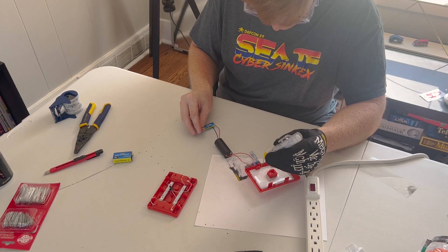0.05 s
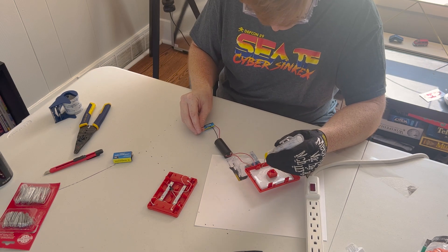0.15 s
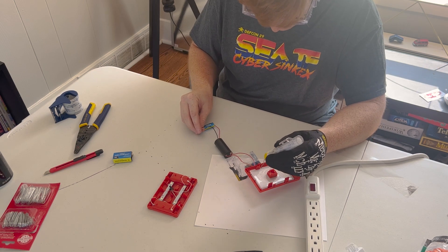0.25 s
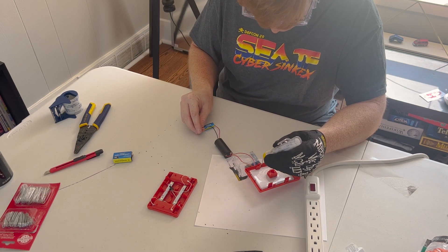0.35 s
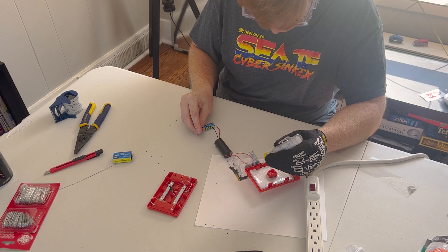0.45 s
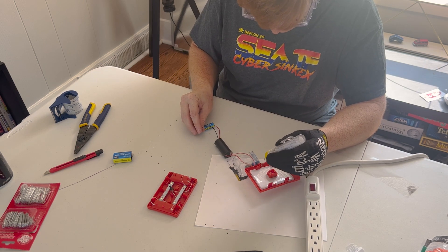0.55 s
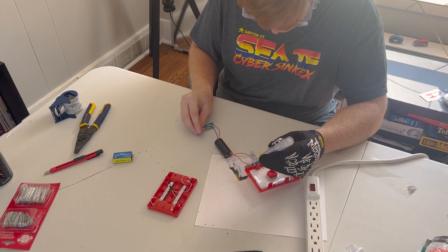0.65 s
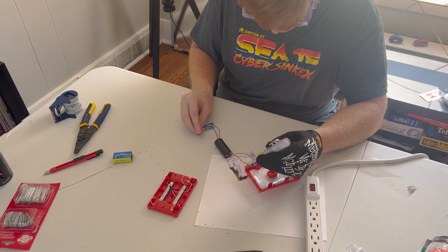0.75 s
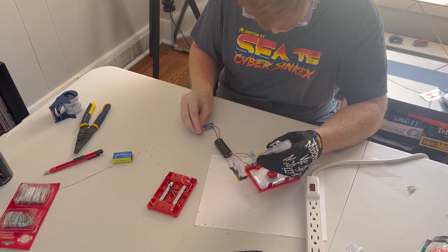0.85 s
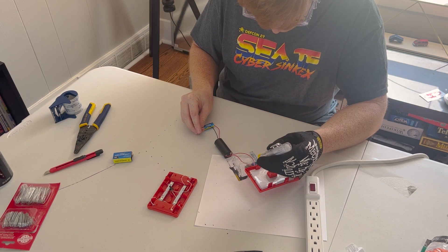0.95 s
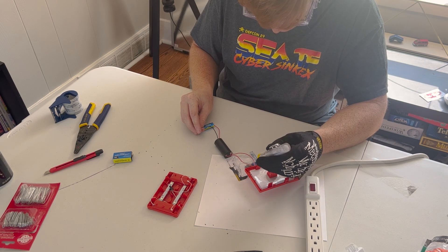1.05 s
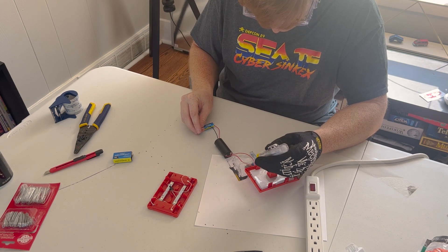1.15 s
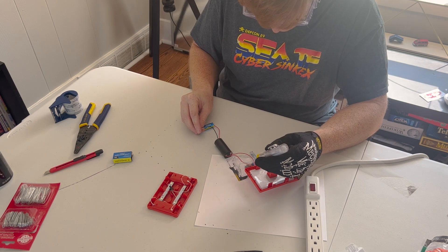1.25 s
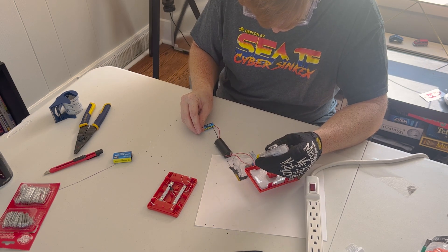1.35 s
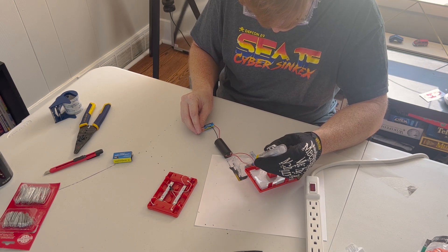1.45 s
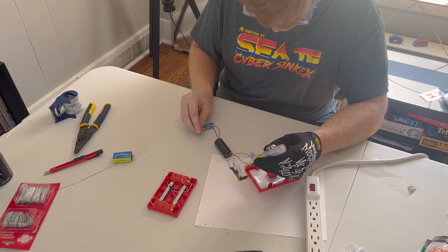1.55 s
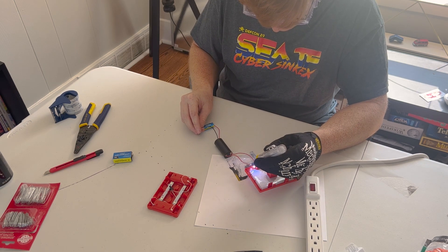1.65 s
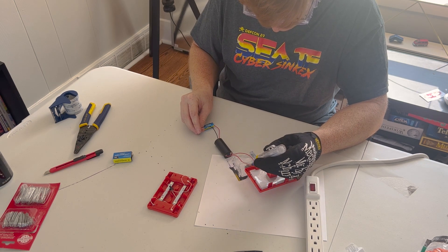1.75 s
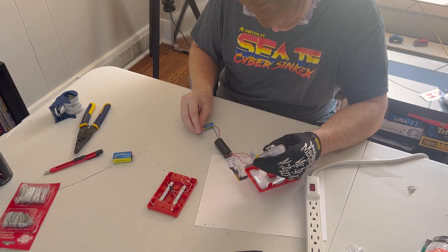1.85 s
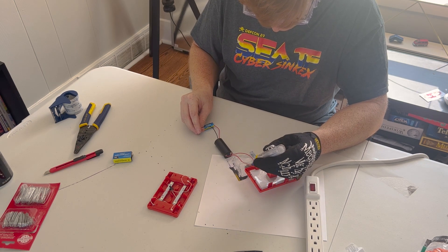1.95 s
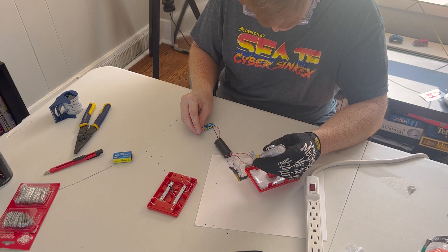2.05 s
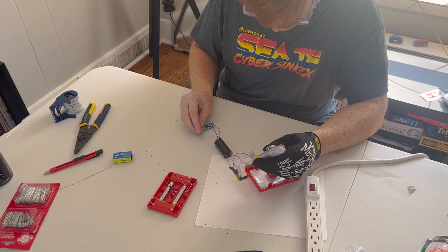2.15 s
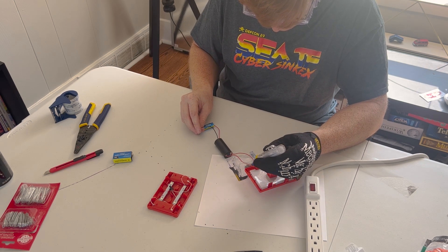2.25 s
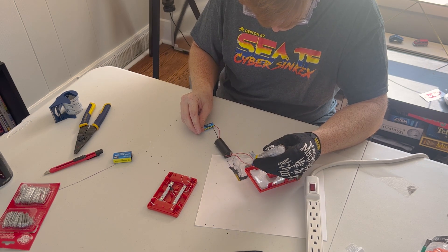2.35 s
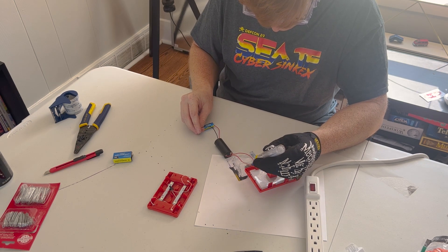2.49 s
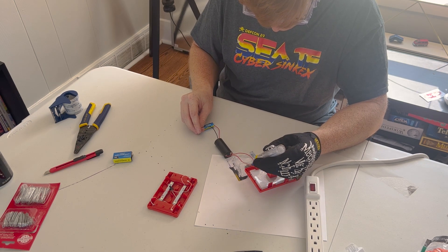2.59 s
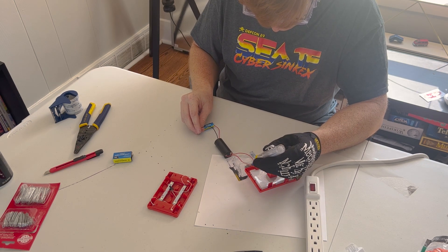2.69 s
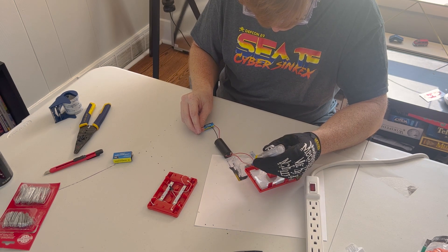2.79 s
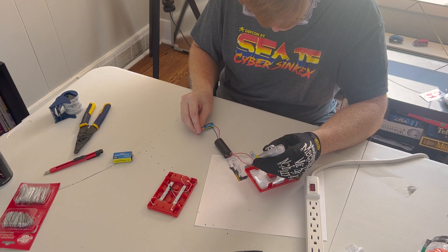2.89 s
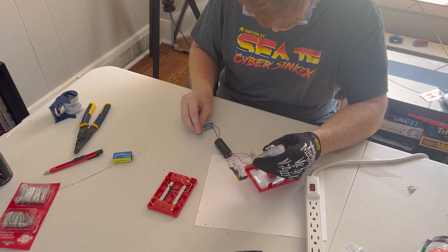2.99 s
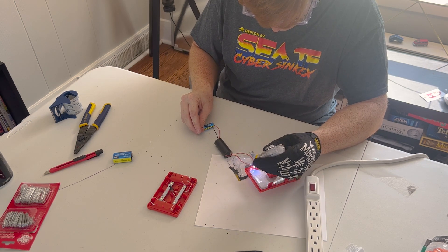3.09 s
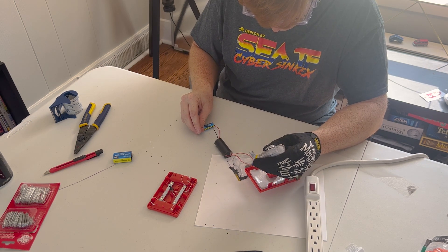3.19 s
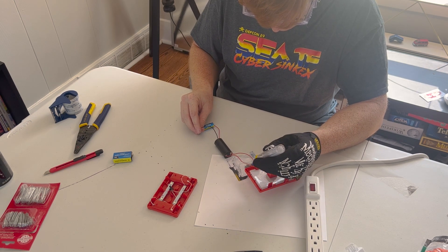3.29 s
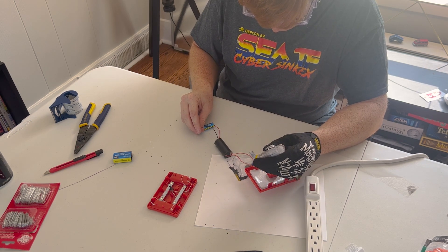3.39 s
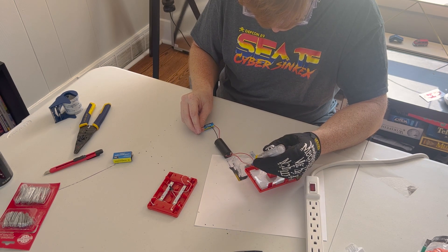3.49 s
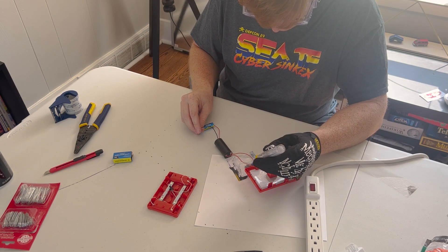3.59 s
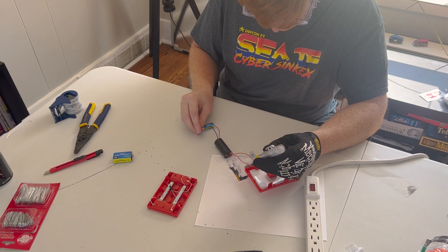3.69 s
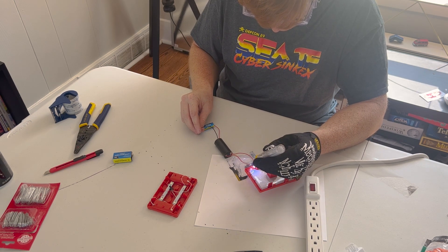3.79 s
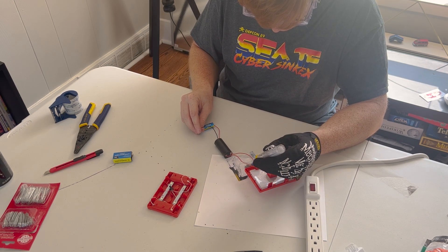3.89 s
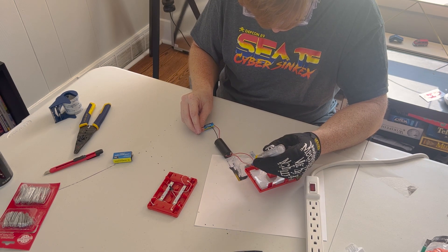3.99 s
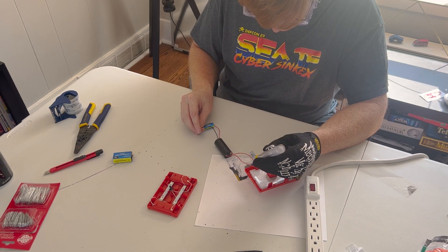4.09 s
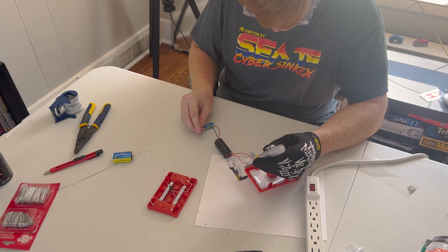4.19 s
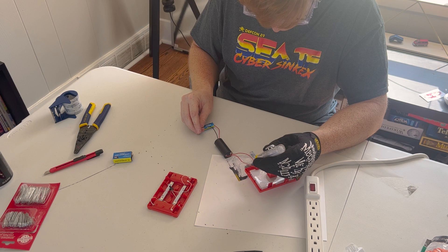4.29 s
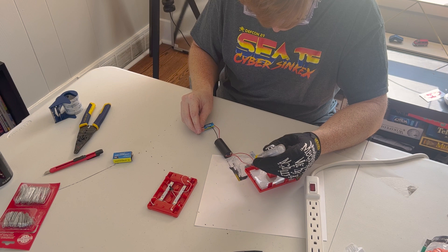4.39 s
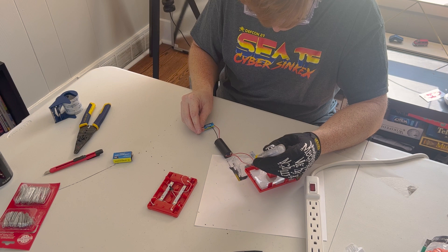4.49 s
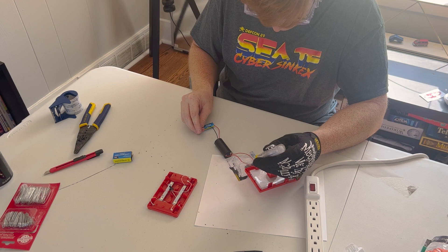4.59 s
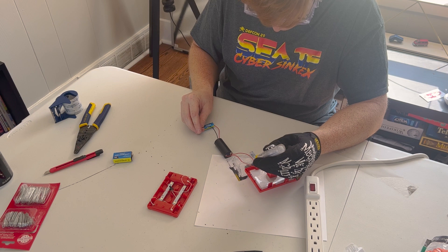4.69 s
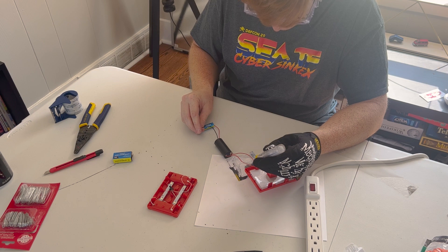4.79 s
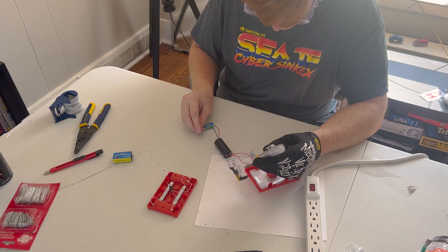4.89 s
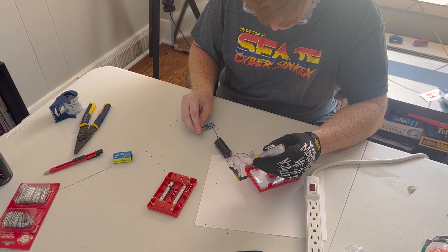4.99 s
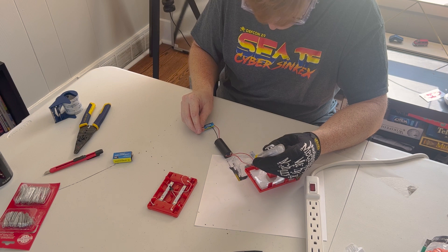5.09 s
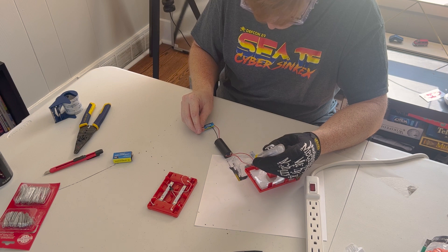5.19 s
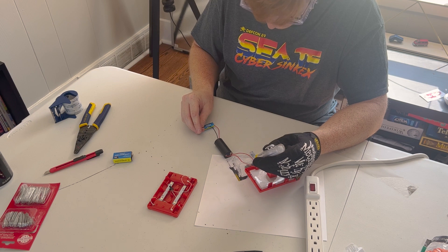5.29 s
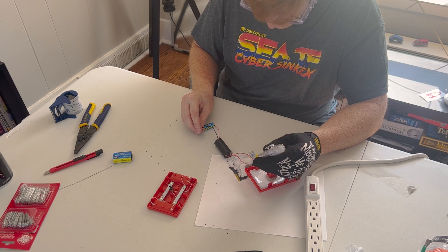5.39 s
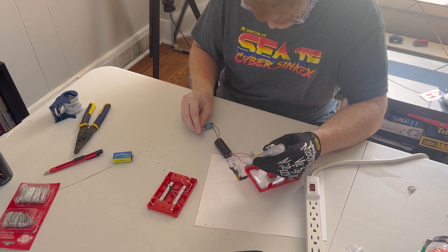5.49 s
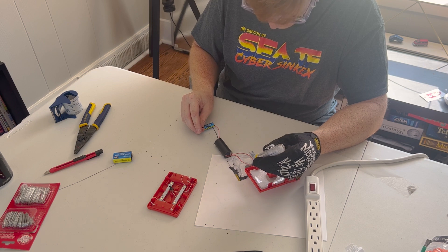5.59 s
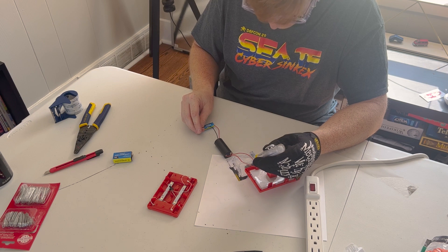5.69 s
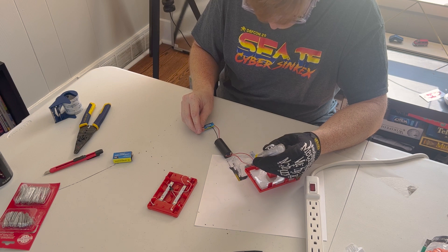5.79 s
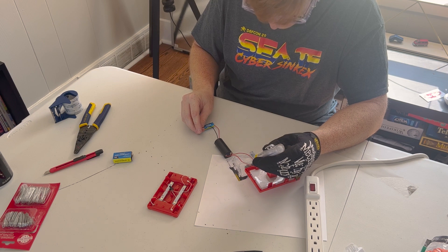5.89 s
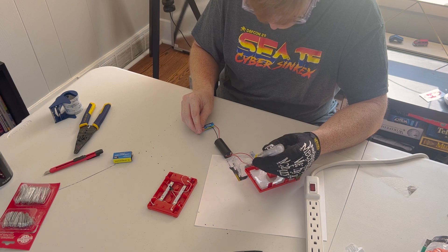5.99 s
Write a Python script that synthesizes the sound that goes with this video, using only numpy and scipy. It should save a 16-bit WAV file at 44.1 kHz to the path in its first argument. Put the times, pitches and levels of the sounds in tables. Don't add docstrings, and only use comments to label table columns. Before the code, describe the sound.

A small high-voltage coil snaps in two quick touches, then crackles steadily about eighteen times a second, close up, with hard room echo.

```python
import sys
import numpy as np
from scipy import signal
from scipy.fft import rfft, irfft, next_fast_len
from scipy.io import wavfile
from scipy.ndimage import uniform_filter1d

SR = 44100
rng = np.random.default_rng(int(sys.argv[2]) if len(sys.argv) > 2 else 0)


def digitize_waveform(pressure):
    field = np.atleast_2d(pressure).T
    bounded = np.clip(field, -1, 1)
    quanta = np.round(bounded * 32767).astype(np.int16)
    wavfile.write(sys.argv[1], SR, quanta)


def linear_from_db(decibels):
    return 10 ** (np.asarray(decibels, float) / 20)


N = 266652


def read(table, hz):
    f, v = np.transpose(table)
    return np.interp(np.log(hz + 1), np.log(f), v)


def shape(x, response):
    n = next_fast_len(x.shape[-1] + 8192)
    hz = np.arange(n // 2 + 1) * SR / n
    return irfft(rfft(x, n) * response(hz), n)[..., :x.shape[-1]]


def low_pass(hz, corner, power=4):
    return 1 / (1 + (hz / corner) ** power)


def unit(x):
    return x / np.sqrt(np.mean(x ** 2))


# frequency in Hz, correlation from 0 to 1.
PORT_LIKENESS = [(100, 0.98), (300, 0.87), (600, 0.33), (2000, 0.16), (4500, 0.19), (6500, 0.47)]
# frequency in Hz, difference in dB.
LEFT_OVER_RIGHT = [(500, -0.5), (1500, 0.5), (3000, 1), (6000, 7.5), (8500, 0.5)]


def ports(a, b, colour, like=0.):
    shared_hz, lag_s = 8000, 6.6 / SR

    def common(hz):
        top = 1 / (1 + (shared_hz / (hz + 1)) ** 16)
        same = np.clip(read(PORT_LIKENESS, hz) + like, 0, 1)
        return top * np.exp(-2j * np.pi * hz * lag_s) + (1 - top) * same

    def separate(hz):
        return np.sqrt(np.clip(1 - abs(common(hz)) ** 2, 0, 1) + .02)

    left = shape(a, common) + shape(b, separate)
    left = shape(left, lambda hz: linear_from_db(read(colour, hz) + read(LEFT_OVER_RIGHT, hz) / 2))
    right = shape(a, lambda hz: linear_from_db(read(colour, hz) - read(LEFT_OVER_RIGHT, hz) / 2))
    return np.array([left, right])


# time in seconds, room gain in dB, bass let through the wind filter in dB.
CAMERA_CONTROLS = [(0, 9, -20), (.3, -1.5, -9.5), (.75, -2, -46), (1.2, -0.5, -46), (1.42, -1.5, -45.5),
                   (1.53, -0.5, -46), (1.7, 0, -46), (1.88, 1, -42), (2.0, -1, -61), (2.5, -1.25, -45.5),
                   (3.05, -1.2, -39), (3.2, -0.8, -43), (3.45, -2, -33.5), (3.6, -1.5, -39.5),
                   (4.05, -1.8, -36.5), (4.35, -2.5, -23.5), (4.6, -2, -27.5), (6.05, -4, -31)]


def control(t, column):
    rows = np.transpose(CAMERA_CONTROLS)
    return np.interp(t, rows[0], rows[column])


def drift(column):
    return control(np.arange(N) / SR, column)


# spark time in seconds, crack level in dB, overload thump in dB.
WIRE_TOUCHES = [
    (0.249, -16.5, -4),
    (0.2981, -15, -34),
    (0.3456, -13.5, -20),
    (0.394, -13.5, -24),
    (0.4442, -13, -25),
    (0.7363, -17, -41),
    (0.787, -10.5, -35),
    (0.8339, -11, -37),
    (0.884, -12, -40),
    (0.9384, -12, -40),
]
# first spark in seconds, recharge time in ms, number of sparks.
HELD_ARC = [(1.174, 52.2, 6), (1.4804, 78.5, 2), (1.6175, 52.8, 2), (1.7214, 65.3, 3), (1.8977, 52.8, 2),
            (1.9918, 56.7, 2), (2.1, 51.0, 5), (2.3539, 53.4, 3), (2.5092, 52.5, 5), (2.7779, 53.4, 4),
            (2.9909, 55.5, 4), (3.2156, 49.5, 2), (3.3213, 51.1, 5), (3.5758, 61.3, 2), (3.6901, 56.4, 5),
            (3.9689, 58.8, 2), (4.0799, 57.3, 2), (4.1922, 50.8, 5), (4.4515, 56.5, 4), (4.6858, 56.2, 2),
            (4.8082, 65.5, 3), (5.0091, 54.6, 2), (5.1248, 51.7, 2), (5.2252, 60.8, 2), (5.3329, 60.8, 3),
            (5.5146, 47.3, 2), (5.6132, 59.9, 2), (5.7367, 57.8, 2), (5.8524, 45.2, 2), (5.9408, 53.5, 2)]


def every_spark():
    level_db, opening_db = -14, -5
    full_charge_ms, thump_db_per_ms = 56, .9
    runs = [first + ms / 1000 * np.arange(int(count)) for first, ms, count in HELD_ARC]
    s = np.concatenate(runs)
    short_ms = np.clip(full_charge_ms - 1000 * np.diff(s, prepend=0), 0, None)
    crack_db = level_db + opening_db * (s == s[0])
    thump_db = control(s, column=2) - thump_db_per_ms * short_ms
    return np.vstack([WIRE_TOUCHES, np.transpose([s, crack_db, thump_db])])


def since_spark():
    t, times = np.arange(N) / SR, every_spark()[:, 0]
    return t - np.append(-99., times)[np.searchsorted(times, t)]


def train(size):
    out = np.zeros(N)
    out[(every_spark()[:, 0] * SR).astype(int)] = size
    return out


def heard(pulses, response, lead):
    return signal.fftconvolve(pulses[None], response, axes=1)[:, lead:lead + N]


# frequency in Hz, level in dB per Hz.
ROOM_TONE = [(15, -38), (25, -8), (55, 0), (326, -11), (384, -19), (439, -15), (714, -25), (1840, -24),
             (3520, -44), (13200, -38), (16000, -45)]


def hush():
    level_db, idle_db, busy_db = -57, -9, -24
    recover_s, rumble_db, rumble_s = 0.26, 27, 0.09
    age = since_spark()
    tone = linear_from_db(idle_db + (busy_db - idle_db) * np.exp(-age / recover_s))
    rumble = linear_from_db(drift(column=2) + rumble_db) * np.exp(-age / rumble_s)
    noise = unit(ports(*rng.standard_normal((2, N)), ROOM_TONE))
    return noise * linear_from_db(level_db) * (tone + rumble)


# time in seconds, kick in dB.
OFFSET_WOBBLE = [
    (0.326, -30),
    (0.371, -28),
    (0.416, -26),
    (0.477, -37),
    (.505, -39),
    (.575, -67),
    (.63, -74),
    (.68, -63),
]


def thumps():
    scatter_db = .8

    def settle(hz):
        return hz ** 4 / (hz ** 4 + 41 ** 4) / (1 + 1j * hz / 58 / 0.55 - (hz / 58) ** 2)

    def twice(hz):
        return 1 + .6 * np.exp(-2j * np.pi * hz * .0025) * low_pass(hz, 450, 2)

    def ring(hz):
        return 1 + 0.036 / (1 + 1j * (hz - 50) / 1.5)

    events = every_spark()
    in_arc = events[:, 0] >= HELD_ARC[0][0]
    luck_db = scatter_db * rng.standard_normal(len(events)) * in_arc
    kick = train(linear_from_db(events[:, 2] + luck_db + 49.5))
    kick = shape(kick, lambda hz: settle(hz) * twice(hz) * ring(hz))
    wobble_s, wobble_db = np.transpose(OFFSET_WOBBLE)
    wobble = np.zeros(N)
    wobble[(wobble_s * SR).astype(int)] = linear_from_db(wobble_db + 54.5)
    kick = kick + shape(wobble, lambda hz: settle(hz) * low_pass(hz, 75))
    skew = 0.083 * np.gradient(kick) * SR / (2 * np.pi * 70)
    return np.array([kick - skew, kick + skew])


# frequency in Hz, level in dB.
ROOM_COLOUR = [(60, -12), (300, -25), (1000, -11), (2100, -9), (2700, -5), (3600, -3.5), (5000, 0),
               (7200, -2.5), (9000, -2), (11500, -0.5), (13500, -5), (15600, 1.5), (15950, -52)]
# frequency in Hz, time in seconds to fade by 60 dB.
ROOM_DECAY = [(200, 0.42), (800, 0.29), (3000, 0.43), (6500, 0.42), (12000, 0.37)]
# delay in ms, spread in ms, dB over the diffuse sound.
FIRST_ECHOES = [
    (5.6, .25, 5),
    (7.4, .25, 3),
    (9.8, .3, 3),
    (13.1, .8, 6.5),
    (21.3, .3, 5),
    (23.0, 1.2, 3.5),
    (30.8, .5, 3),
    (33.8, .4, 4),
]


def room(lead):
    level_db, start_s, build_s, size = -22, 0.0052, 0.0056, 1 << 15
    t = (np.arange(size) - lead) / SR
    noise, tail = rng.standard_normal((2, size)), 0
    for centre in 60 * 2. ** np.arange(9):
        band = shape(noise, lambda hz: np.cos(np.pi / 2 * np.clip(np.log2((hz + 1) / centre), -1, 1)) ** 2)
        tail = tail + band * linear_from_db(-60 * t / read(ROOM_DECAY, centre))
    swell = 1 - 0.98 * np.exp(-np.maximum(t - start_s, 0) / build_s)
    for ms, wide, db in FIRST_ECHOES:
        swell = swell + (linear_from_db(db) - 1) * np.exp(-((t * 1000 - ms) / wide) ** 2)
    pair = ports(*(tail * swell * (t > start_s)), ROOM_COLOUR)
    return linear_from_db(level_db) * pair / np.std(pair[:, lead + 400:lead + 1200])


# frequency in Hz, level in dB.
CRACK_COLOUR = [(200, -14), (600, -11), (1100, -7), (2000, -3), (2900, -10), (4000, -4), (5400, -6),
                (6400, 7), (8200, 5), (9500, -1), (12500, -4), (15400, 9), (16550, -3), (16900, -50)]


def crack(lead):
    body_s, tail_db, tail_s = .00072, -10, .0014
    t = (np.arange(1024) - lead) / SR
    tail = linear_from_db(tail_db) * np.exp(-(t - body_s) / tail_s)
    body = (t >= 0) * np.where(t < body_s, 1, tail)
    burst = np.sign(rng.standard_normal((2, 1024))) * body
    for _ in range(6):
        tone = rfft(burst)
        burst = irfft(tone / np.sqrt(uniform_filter1d(abs(tone) ** 2, size=9)))
        burst = np.clip(burst / np.std(burst[:, lead:lead + 30]), -1.2 * body, 0.74 * body)
    pair = ports(*burst, CRACK_COLOUR, like=0.4)
    return pair / np.sqrt(np.sum(pair ** 2) / 125)


# spark time in seconds, smear level in dB, level in dB of a ghost one short block early.
EARLY_SMEAR = [
    (.2493, -46, -52),
    (.7367, -47, -46),
    (1.1746, -40, -30),
    (1.28, -42, -30),
    (.394, -44, -34),
]


def pre_echo(click, lead):
    block_s = 256 / 48000
    t, ghosts, smear = np.arange(N) / SR, np.zeros(N), np.zeros(N)
    for s, smear_db, ghost_db in EARLY_SMEAR:
        for k in (1, 2):
            ghosts[int((s - k * block_s) * SR)] = linear_from_db(ghost_db - 10 * (k - 2.5))
        before = (t < s) * (t > s - .017)
        smear += linear_from_db(smear_db) * before * np.exp(np.minimum(t - s, 0) / 0.0041)
    hiss = ports(*rng.standard_normal((2, N)), CRACK_COLOUR, like=0.32)
    early = heard(ghosts, click, lead) + smear * 2.6 * hiss
    return shape(early, lambda hz: low_pass(hz, 8400, 24) / (1 + (3300 / (hz + 1)) ** 6))


def sparks(lead):
    scatter_db, bass_db, deep_db = 0.97, 6, -9
    open_db, bass_share = -36, .4
    duck_db, duck_s = -3.5, 0.026
    events = every_spark()
    wander = rng.standard_normal((len(events), 3)).T
    size = linear_from_db(events[:, 1] + scatter_db * wander[2])
    size = size / np.sqrt(1 + 0.019 * (wander[0] ** 2 + wander[1] ** 2))

    first = crack(lead)
    cracks = heard(train(size), first, lead)
    others = sum(heard(train(.2 * size * w), crack(lead), lead) for w in wander[:2])
    cracks = cracks + shape(others, lambda hz: hz ** 2 / (hz ** 2 + 900 ** 2))

    other_room = shape(room(lead), lambda hz: hz ** 2 / (hz ** 2 + 600 ** 2))
    echo = heard(train(1.), room(lead), lead)
    echo = echo + heard(train(0.69 * np.tanh(wander[2])), other_room, lead)
    bass = shape(echo, lambda hz: low_pass(hz, 1100))
    lows = linear_from_db(bass_db + bass_share * np.minimum(drift(column=2) - open_db, 0))
    echo = (echo + bass * (lows - 1)) * linear_from_db(drift(column=1))

    age = since_spark()
    duck = linear_from_db(duck_db * (1.5 - np.exp(-age / 0.0014)) * np.exp(-age / duck_s))
    echo = echo * duck
    deep = shape(cracks + echo, lambda hz: low_pass(hz, 170))
    low = shape(cracks, lambda hz: low_pass(hz, 600))
    thinned = low * (lows - 1) + deep * lows * (linear_from_db(deep_db) - 1)
    return cracks + thinned + echo + pre_echo(first, lead)


def scene():
    return sparks(lead=256) + thumps() + hush()


def starve(x, lo_hz, hi_hz, share, size=940):
    band = shape(x, lambda hz: 1 / (1 + ((2 * hz - lo_hz - hi_hz) / (hi_hz - lo_hz)) ** 12))
    drop = np.repeat(rng.random(N // size + 1) < share, size)[:N]
    drop = drop * (since_spark() > .004)
    return x - band * uniform_filter1d(1. * drop, size=120)


def band_limit(x):
    return signal.sosfilt(signal.butter(12, 16970, fs=SR, output="sos"), x)


def record(dry):
    def crossovers(hz):
        return np.exp(-2j * np.pi * 1.03 * np.log(np.hypot(hz, 20.5) / 57.0))

    left, right = shape(dry, crossovers)
    mid = starve((left + right) / 2, lo_hz=9450, hi_hz=10800, share=.8)
    mid = starve(mid, lo_hz=9300, hi_hz=11600, share=.55, size=470)
    mid = starve(mid, lo_hz=8900, hi_hz=10500, share=.2, size=235)
    side = starve((left - right) / 2, lo_hz=11800, hi_hz=14600, share=1.0)
    return band_limit(np.array([mid + side, mid - side]))


dry = scene()
out = record(dry)
digitize_waveform(out)
```